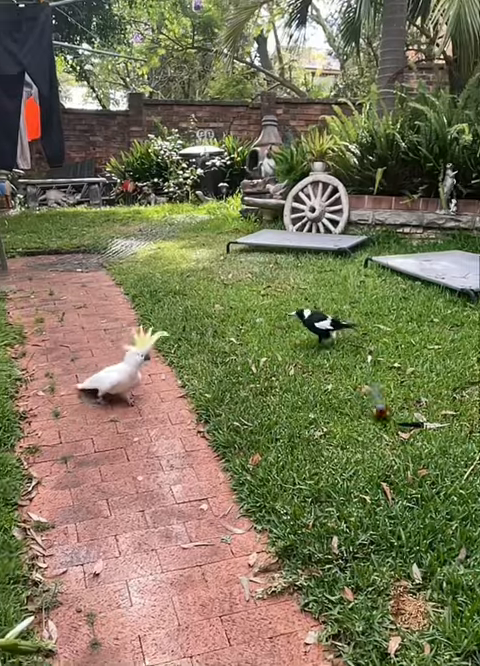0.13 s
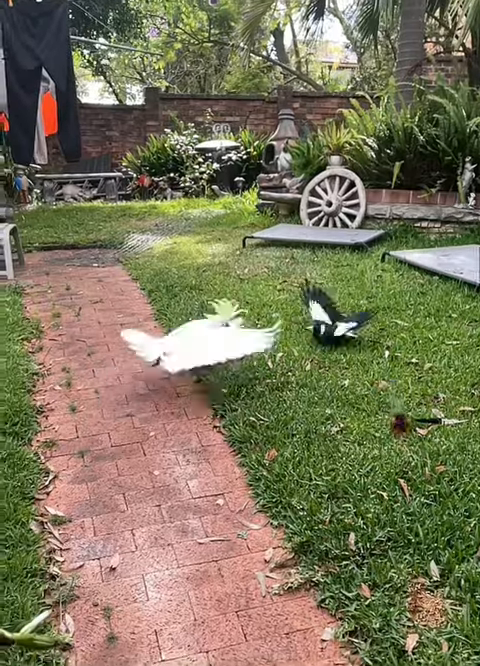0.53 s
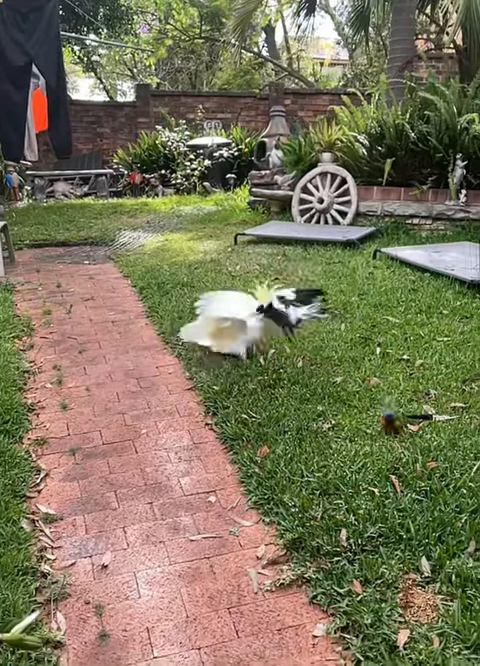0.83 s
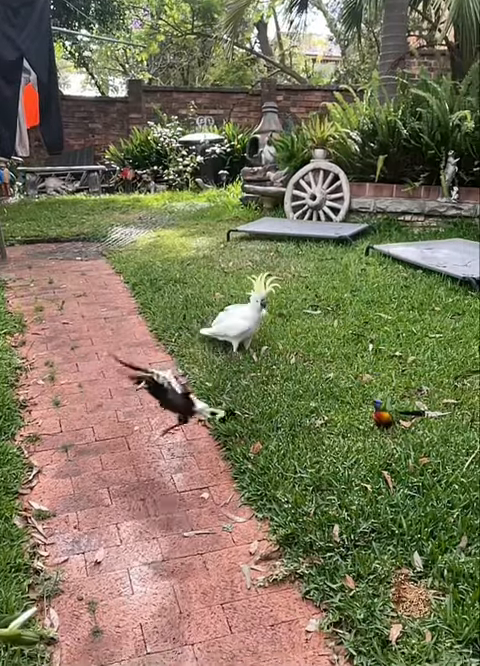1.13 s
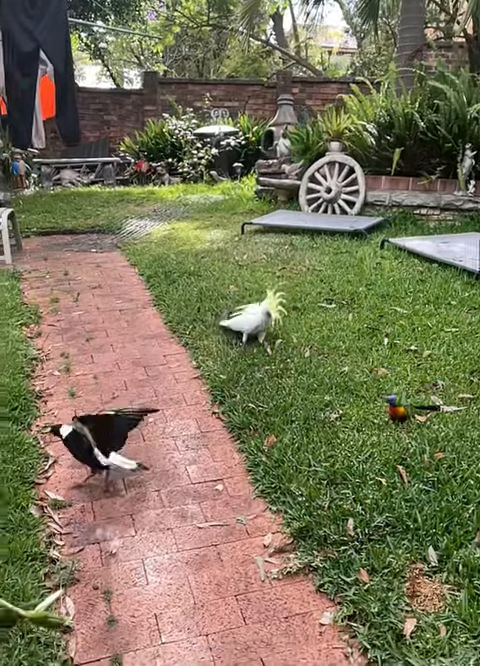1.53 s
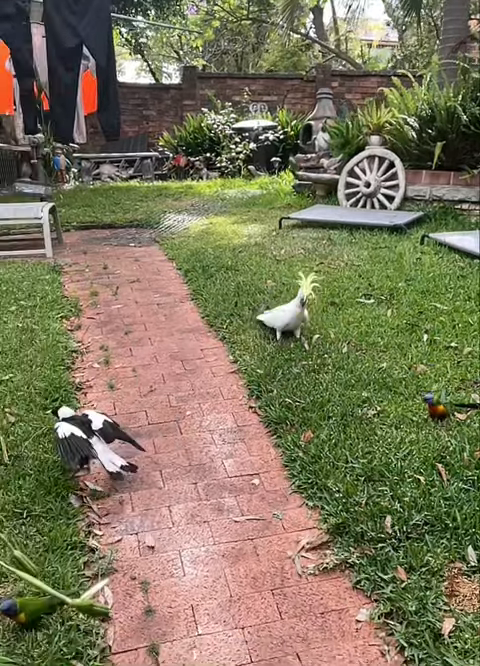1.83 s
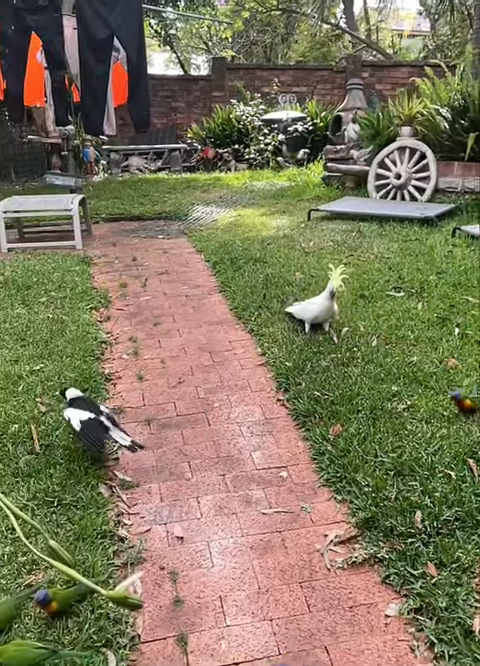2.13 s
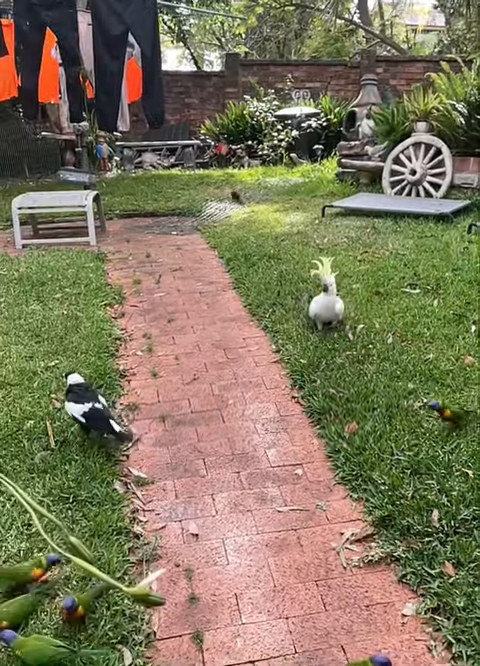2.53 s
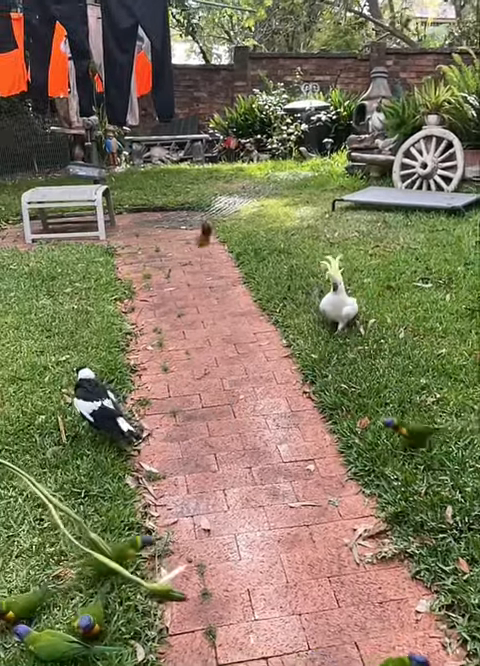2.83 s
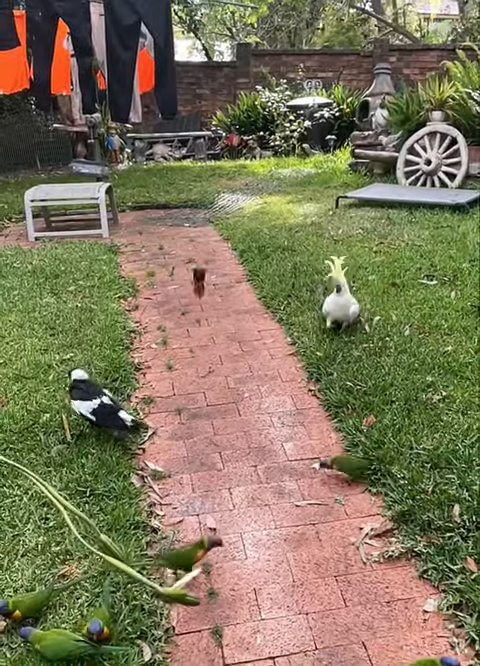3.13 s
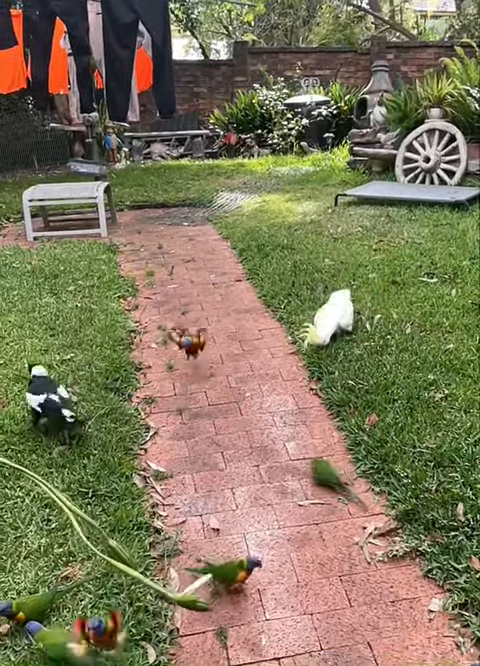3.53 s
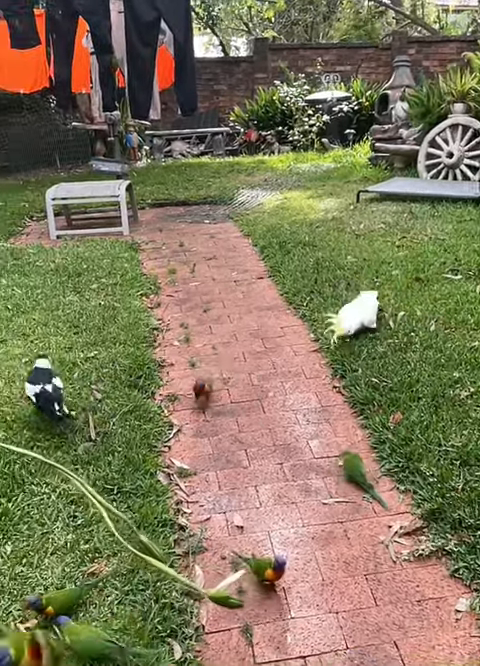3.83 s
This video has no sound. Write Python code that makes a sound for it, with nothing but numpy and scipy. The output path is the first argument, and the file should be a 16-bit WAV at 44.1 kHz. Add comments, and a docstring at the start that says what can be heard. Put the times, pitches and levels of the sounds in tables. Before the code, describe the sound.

Lorikeets screech in a walled backyard with short scattered echoes. Quick high shrieks chatter from 0 to 0.8 seconds, with falling magpie squawks near 0.7 and soft wingbeats. Rougher, quieter rasps follow from 1 second; piercing shrieks cluster at 2.2 to 2.5. Louder grating screeches run from 2.65 to the end, with wing flutter after 3.4, a clean squawk at 3.7, and low rumble swelling under faint steady air.

```python
"""One hears lorikeets shriek and screech in a walled backyard while a magpie squawks now and then.
Arched shrieks and long rasps are harmonic sums with randomly shaken pitch and fluttering partials.
Falling squawks have three partials; wingbeats are puffs of filtered noise.
Steady air and a swelling rumble are filtered noise too; walls and foliage return each call as a
short tail of scattered echoes."""
import sys
import numpy as np
from scipy import signal
from scipy.fft import rfft, irfft, next_fast_len
from scipy.io import wavfile

SR = 44100
rng = np.random.default_rng(int(sys.argv[2]) if len(sys.argv) > 2 else 0)


def dump(signal):
    """Clip the signal to [-1, 1] and save it as 16-bit WAV at the path in sys.argv[1]."""
    limited = np.clip(np.atleast_2d(signal).T, -1, 1)
    pcm = np.round(limited * 32767).astype(np.int16)
    wavfile.write(sys.argv[1], SR, pcm)


N = 176400
T = np.arange(N) / SR  # s


def from_db(db):
    """Decibel definition: 20 dB is a factor of ten in amplitude."""
    return 10 ** (np.asarray(db) / 20)


def rms_one(x):
    """Power normalisation: scale to a root-mean-square of 1."""
    return x / np.sqrt(np.mean(x ** 2) + 1e-20)


def at_hz(points, hz):
    """Frequency response: gain read between points on a logarithmic frequency axis."""
    f, db = np.transpose(points)
    return from_db(np.interp(np.log(hz + 1e-9), np.log(f), db))


def colour(x, points):
    """Zero-phase filtering: multiply the spectrum by a smooth gain."""
    size = next_fast_len(N + 4096)  # padding limits wrap-around
    hz = np.arange(size // 2 + 1) * SR / size
    return irfft(rfft(x, size) * at_hz(points, hz), size)[..., :N]


def wobble(n, rate_hz):
    """Band-limited random motion: low-passed noise of unit spread."""
    lowpass = signal.butter(5, rate_hz, fs=SR, output="sos")
    slow = signal.sosfilt(lowpass, rng.standard_normal(n + 3000))
    return rms_one(slow[-n:])  # the filter's onset is dropped


def add(out, start, sound):
    """Superposition: sum a sound into the mix from its start in seconds."""
    i = max(int(start * SR), 0)
    out[i:i + len(sound)] += sound[:max(N - i, 0)]


def arch(length, pitches, attack, release):
    """Frequency and amplitude contour: a parabola through three pitches, with sine-shaped edges."""
    t = np.arange(int(length * SR)) / SR
    parabola = np.polyfit([0, .5, 1], pitches, 2)
    pitch = np.polyval(parabola, t / length)
    edge = np.clip(t / attack, 0, 1) * np.clip((length - t) / release, 0, 1)
    return pitch, np.sin(edge * np.pi / 2)


def syrinx(pitch, gains, rough, jitter, jitter_hz, flutter_db, flutter_hz):
    """Harmonic source: one membrane, whose rate shakes and partials flutter with roughness."""
    n = len(pitch)
    shaken_pitch = pitch * (1 + rough * jitter * wobble(n, jitter_hz))
    phase = 2 * np.pi * np.cumsum(shaken_pitch) / SR
    shared = wobble(n, flutter_hz)
    tone = 0
    for k, gain in enumerate(gains, 1):
        swing = np.tanh((shared + wobble(n, flutter_hz)) / 2)  # keeps the flutter within limits
        flutter = rms_one(from_db(flutter_db * np.sqrt(abs(rough)) * swing))
        audible = k * pitch < .45 * SR  # avoids aliasing
        tone = tone + gain * flutter * np.sin(k * phase) * audible
    return np.sqrt(2) * tone


# Lorikeet shrieks, and at 0.72 s the faint ringing of one near 3.1 kHz.
# Each row: start in seconds, length in seconds, pitch in Hz at the start, middle
# and end, level in dB of the fundamental before the yard, 2nd harmonic in dB relative to it,
# offset in dB of the higher harmonics, and roughness (0 is smooth).
SHRIEK_NOTES = [ (0.022, 0.055, 3137, 2914, 2760, -38, -1.5, -7, 0.65),
                (0.127, 0.066, 2388, 2194, 2424, -38, -7, -7, 0.13),
                (0.171, 0.065, 2320, 2425, 2438, -34, -3.5, -7, 0.18),
                (0.231, 0.093, 2720, 2429, 2300, -37.5, -4.5, -8.5, 0.41),
                (0.329, 0.11, 2522, 2552, 2540, -51.5, 11, 0, 0.57),
                (0.393, 0.097, 2990, 2816, 2743, -45, 0.5, -1.5, 0.03),
                (0.533, 0.061, 3284, 3170, 2920, -43.5, 1, -4, 1.12),
                (0.564, 0.069, 2853, 2640, 2660, -45, 5.5, -7, 0.24),
                (0.595, 0.076, 2927, 3123, 3055, -39.5, 2.5, -10, 0.02),
                (0.64, 0.11, 2960, 2900, 2940, -36, -12, -23, 0.32),
                (0.587, 0.025, 4170, 4266, 4140, -33, -11, -28, 0.1),
                (0.72, 0.18, 3100, 3096, 3090, -57.5, -21, -21, 0.1),
                (1.372, 0.051, 2957, 2923, 3300, -43.5, 2.5, -9, 0.23),
                (1.412, 0.071, 3140, 3216, 3530, -39.5, 5, -4.5, 0),
                (1.661, 0.11, 2253, 2895, 2980, -48.5, 9.5, -3, 0.44),
                (1.871, 0.045, 2510, 2700, 2920, -42, -0.5, 5, 0.08),
                (1.922, 0.071, 3760, 4017, 3600, -39, -3.5, -17, 0.12),
                (1.959, 0.051, 3077, 2436, 2185, -45, 3.5, 5, 0.2),
                (1.988, 0.13, 2833, 2622, 2555, -45.5, -6, -16, 1.23),
                (2.178, 0.039, 1514, 1723, 1830, -41, -2.5, 2, 0.56),
                (2.196, 0.04, 3386, 3130, 3090, -33.5, 0, -6.5, 0.22),
                (2.228, 0.017, 4170, 4287, 4120, -24, -16, -32, 0.3),
                (2.236, 0.063, 3077, 3497, 3360, -31, 0.5, -13, 0.42),
                (2.284, 0.036, 4350, 4413, 4360, -24.5, -3.5, -18, 0.31),
                (2.303, .055, 3424, 3340, 3050, -34.5, 2.5, -6.5, 0.42),
                (2.353, 0.088, 3106, 2986, 2950, -39, -4.5, -16, 0.34),
                (2.33, 0.082, 1499, 1555, 1510, -46, 4.5, -14, 0.37),
                (2.416, 0.07, 3960, 4066, 4330, -38.5, -9.5, -14, 0.08),
                (2.461, 0.04, 2940, 3247, 3080, -39, 5.5, -0.5, 0),
                (2.496, 0.076, 3110, 2867, 3220, -35, -6, -42, 0.2),
                (2.749, 0.066, 1510, 1560, 1520, -46, 2, -7, 0),
                (2.838, 0.084, 2980, 2677, 2580, -40.5, -2, -23, 0.47),
                (2.918, 0.12, 2760, 2982, 3150, -36.5, -4, -13.5, 0.33),
                (3.14, 0.14, 2910, 2960, 3134, -44, 1.5, -1.5, 0.4),
                (3.587, 0.12, 2570, 2480, 2590, -44.5, -6, -0.5, 0.54),
                (3.704, 0.043, 2503, 2703, 2770, -33, 2, 1.5, 0.1),
                (3.731, 0.037, 2655, 2752, 2905, -32, -8, 8.5, 0.08)]
# Relative levels of the 3rd, 4th and 5th harmonics, in dB, before each note's offset.
UPPER_HARMONICS_DB = [-5.5, -0.5, -6.5]
SHRIEK_ATTACK_S, SHRIEK_RELEASE_S = 0.0094, 0.014
WAVER, WAVER_HZ = 0.00916, 60.3  # spread as a share of the pitch, fastest rate
HISS_DB = -9  # at roughness 1, relative to the fundamental


def shrieks():
    """Harmonic synthesis and turbulence: five partials, with a hiss of rushing air in rough notes."""
    out, airflow = np.zeros((2, N))
    for s, length, f0, f1, f2, db, second_db, high_db, rough in SHRIEK_NOTES:
        pitch, env = arch(length, [f0, f1, f2], SHRIEK_ATTACK_S, SHRIEK_RELEASE_S)
        pitch = pitch * (1 + WAVER * wobble(len(pitch), WAVER_HZ))
        gains = from_db([0, second_db] + [high_db + h for h in UPPER_HARMONICS_DB])
        voice = syrinx(pitch, gains, rough, jitter=0.024, jitter_hz=453,
                       flutter_db=10.0, flutter_hz=356)
        add(out, s, from_db(db) * env * voice)
        add(airflow, s, from_db(db + HISS_DB) * env * rough)
    hiss = rms_one(colour(rng.standard_normal(N), THROAT_RESONANCE))
    return out + airflow * hiss


# Rasping screeches. Each row: start in seconds, length in seconds, pitch in Hz at the start, middle
# and end, level in dB before the yard, roughness (0 is smooth), and lift of the fundamental in dB.
SCREECH_CALLS = [ (0.97, 0.29, 818.5, 1069, 1058, -40.5, 1.36, 10),
                 (1.268, 0.13, 940, 1105, 1259, -38.5, 1.29, 0),
                 (1.493, 0.14, 996, 1130, 1166, -39, 1.38, 3),
                 (1.769, 0.12, 871, 1023, 1160, -34.5, 1.37, 2),
                 (1.945, 0.22, 1223, 1145, 1302, -45, 1.15, 5.5),
                 (2.314, 0.3, 1020, 1099, 1009, -38.5, 0.88, 2.5),
                 (2.646, 0.12, 971, 1041, 1115, -29, 0.9, 2),
                 (2.727, 0.14, 1072, 1123, 1136, -27.5, 0.24, -4.5),
                 (2.808, 0.16, 1051, 998, 1001, -31, 0.25, -39),
                 (3.008, 0.21, 1018, 1116, 1168, -29, 0.36, -1),
                 (3.251, 0.2, 954, 1067, 1142, -30.5, 0.73, 0.5),
                 (3.427, 0.15, 1140, 1145, 1039, -27, 0.83, -0.5),
                 (3.705, 0.21, 1038, 1140, 1194, -29, 0.5, 5),
                 (3.854, 0.24, 977, 1095, 1119, -27.5, 0.61, 3.5)]
# Throat resonance, which also colours the shrieks' hiss. Each row: frequency in Hz, relative gain in dB.
THROAT_RESONANCE = [(1100, -13.5), (2150, -12), (2850, -9.5), (4400, 2.5), (5300, -2.5), (6200, -2),
                    (8000, -1.5), (13500, -11), (16000, -69)]
SCREECH_ATTACK_S, SCREECH_RELEASE_S = 0.047, 0.022
RASP_BODY_DB = 3  # lift of the 2nd and 3rd harmonics at roughness 1
CORE_SHARE = 0.62  # power share of the firm tone at roughness 0
CORE_BASE_DB = -30  # fundamental of the firm tone, relative to its 4th harmonic


def screeches():
    """Source and filter: a chaotic voice rings the throat at its 4th harmonic, firmer when clean."""
    out = np.zeros(N)
    for s, length, f0, f1, f2, db, rough, base_db in SCREECH_CALLS:
        pitch, env = arch(length, [f0, f1, f2], SCREECH_ATTACK_S, SCREECH_RELEASE_S)
        pitch = pitch * (1 + 0.02077 * rough * wobble(len(pitch), rate_hz=45.9))
        gains = []
        for k in range(1, 15):
            lift_db = base_db * (k == 1) + RASP_BODY_DB * rough ** 2 * (k in (2, 3))
            gains.append(at_hz(THROAT_RESONANCE, k * pitch) * from_db(lift_db))
        rasp = rms_one(syrinx(pitch, gains, rough, jitter=0.0498, jitter_hz=520,
                              flutter_db=14.5, flutter_hz=258))
        core = syrinx(pitch, [from_db(CORE_BASE_DB), 0, 0, 1], rough, jitter=0.0464, jitter_hz=241,
                      flutter_db=20, flutter_hz=121)
        share = np.clip(CORE_SHARE * (1 - rough), 0, 1)
        voice = np.sqrt(1 - share) * rasp + np.sqrt(share) * core
        add(out, s, from_db(db) * env * voice)
    return out


# Magpie's squawks, and first a faint low tone near 1.8 kHz.
# Each row: start in seconds, length in seconds, pitch in Hz at the start, middle
# and end, level in dB of the fundamental before the yard, and roughness (0 is smooth).
SQUAWK_NOTES = [ (0.257, 0.16, 1800, 1780, 1692, -53, 0.35), (0.655, 0.13, 2230, 1915, 1722, -36, 0.56),
                (0.789, 0.047, 1729, 1828, 1993, -34, 0.37), (1.267, 0.0885, 1774, 1700, 1558, -48, 1.2),
                (3.73, 0.16, 2220, 1994, 1765, -29, 0.07)]


def squawks():
    """Frequency glide: mostly falling notes of nearly one partial, harsh or clean."""
    out = np.zeros(N)
    for s, length, f0, f1, f2, db, rough in SQUAWK_NOTES:
        pitch, env = arch(length, [f0, f1, f2], attack=0.044, release=0.0069)
        voice = syrinx(pitch, from_db([0, -21, -25]), rough, jitter=0.097, jitter_hz=326,
                       flutter_db=11.5, flutter_hz=216)
        add(out, s, from_db(db) * env * voice)
    return out


# Wing downstrokes. Each row: time of the peak in seconds, level in dB.
DOWNSTROKES = [(0.531, -43), (0.606, -42.5), (0.786, -40.5), (3.43, -43.5), (3.521, -37.5), (3.622, -37),
               (3.689, -38.5), (3.77, -43.5), (3.891, -49)]
# Spectrum of a puff of air. Each row: frequency in Hz, relative gain in dB.
PUFF_SPECTRUM = [(130, 13.5), (370, 0), (650, 4.5), (1300, 3), (12000, -7)]
WING_SIDE, WING_STROKE_S = 0.34, 0.019  # stereo difference share, standard deviation of a puff


def wings():
    """Turbulent noise: each downstroke pushes a puff of air with a bell-shaped envelope."""
    env = 0
    for s, db in DOWNSTROKES:
        env = env + from_db(db) * np.exp(-.5 * ((T - s) / WING_STROKE_S) ** 2)
    mid, side = rng.standard_normal((2, N))
    stereo = mid + WING_SIDE * side * [[1], [-1]]
    return env * rms_one(colour(stereo, PUFF_SPECTRUM))


# Spectrum of the outdoor air. Each row: frequency in Hz, relative gain in dB.
AIR_SPECTRUM = [(25, -19), (55, -7.5), (85, -7), (150, -10), (350, -18), (5000, -15), (15000, -25.5)]
# Spectrum of the low rumble. Each row: frequency in Hz, relative gain in dB.
RUMBLE_SPECTRUM = [(25, -18), (55, -2.5), (85, -0.5), (130, -7.5), (250, -27)]
# Swell of the rumble. Each row: time in seconds, level in dB.
RUMBLE_SWELL = [(0, -59), (1.7, -59), (2.0, -58), (2.9, -55.5), (3.7, -42.5)]
AIR_DB, AIR_SIDE = -52, 0.56  # level, stereo difference share


def background():
    """Stationary and modulated noise: steady outdoor air and a low rumble that swells."""
    mid, side, low = rng.standard_normal((3, N))
    air = rms_one(colour(mid + AIR_SIDE * side * [[1], [-1]], AIR_SPECTRUM))
    rumble = rms_one(colour(low, RUMBLE_SPECTRUM))
    swell = from_db(np.interp(T, *np.transpose(RUMBLE_SWELL)))
    return from_db(AIR_DB) * air + swell * rumble


YARD_T60_S, YARD_TREBLE_T60_S = 0.41, 0.17  # times to fall by 60 dB
YARD_GAP_S = .006  # no echo arrives sooner


def yard(x, lag_s, direct_db, echo_db):
    """Reverberation: direct sound, later on the right, plus echoes per ear whose treble dies first."""
    t = T[:SR]
    arrivals = rng.standard_normal((2, SR))
    scatter = arrivals * (rng.random((2, SR)) < 900 / SR) * (t > YARD_GAP_S)  # about 900 echoes a second
    dull = signal.sosfilt(signal.butter(2, 6000, fs=SR, output="sos"), scatter)
    tail = dull * from_db(-60 * t / YARD_T60_S) + scatter * from_db(-60 * t / YARD_TREBLE_T60_S)
    tail /= np.sqrt(np.sum(tail ** 2, axis=1, keepdims=True))  # unit energy at each ear
    direct = np.array([x, np.interp(T - lag_s, T, x)])
    echoes = signal.fftconvolve(x[None], tail, axes=1)[:, :N]
    return from_db(direct_db) * direct + from_db(echo_db) * echoes


def scene():
    """Superposition: the birds heard through the yard, then wings and background."""
    birds = (yard(shrieks(), lag_s=.00028, direct_db=3, echo_db=-1.5)
             + yard(screeches(), lag_s=0.00023, direct_db=-5.0, echo_db=-1.5)
             + yard(squawks(), lag_s=.0001, direct_db=3.5, echo_db=-5.5))
    return birds + wings() + background()


# Response of the microphones. Each row: frequency in Hz, gain in dB.
MIC_RESPONSE = [(6500, 0.5), (7400, -10.5), (8300, 9), (13000, -2), (15000, -8)]
# Stereo balance. Each row: frequency in Hz, gain in dB raised on the left and lowered on the right.
LEFT_FAVOUR = [(2200, 0.5), (3200, 2.5), (5500, 4)]
MONO_ABOVE_HZ = 7900  # one signal feeds both sides above this
OPPOSED_HZ, IN_PHASE_HZ = 9035, 12880  # where the sides are opposed, and from where they agree
CUTOFF_HZ, START_S = 15750, .035  # top of the band, silence before the sound cuts in


def record(dry):
    """Stereo transduction: a left-leaning pair dips at its crossover, then shares a phase-turned treble."""
    left, right = rfft(colour(dry, MIC_RESPONSE))
    hz = np.arange(len(left)) * SR / N
    balance = at_hz(LEFT_FAVOUR, hz)
    turn = np.exp(-1j * np.pi * np.maximum(IN_PHASE_HZ - hz, 0) / (IN_PHASE_HZ - OPPOSED_HZ))
    separate, shared = [left * balance, right / balance], [left, left * turn]
    pair = irfft(np.where(hz < MONO_ABOVE_HZ, separate, shared), N)
    top_cut = signal.ellip(12, .1, 80, CUTOFF_HZ, fs=SR, output="sos")
    return signal.sosfilt(top_cut, pair * (T > START_S))


dry = scene()
out = record(dry)
dump(out)
```